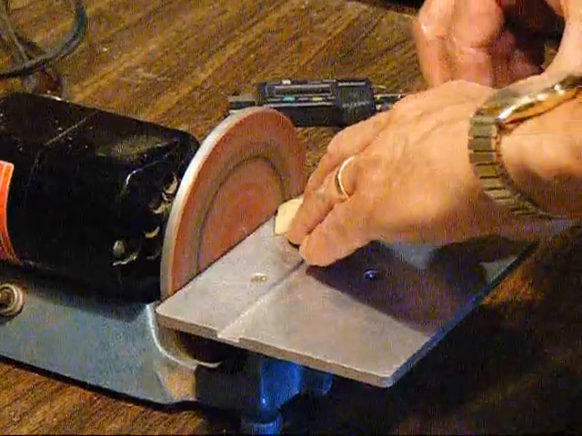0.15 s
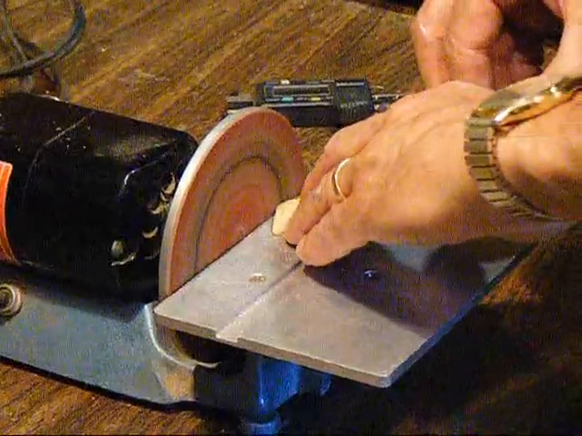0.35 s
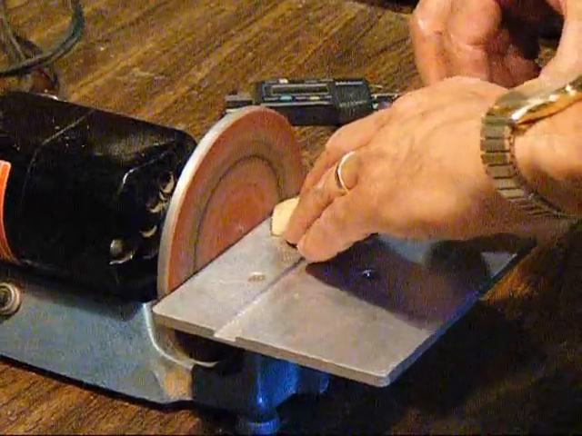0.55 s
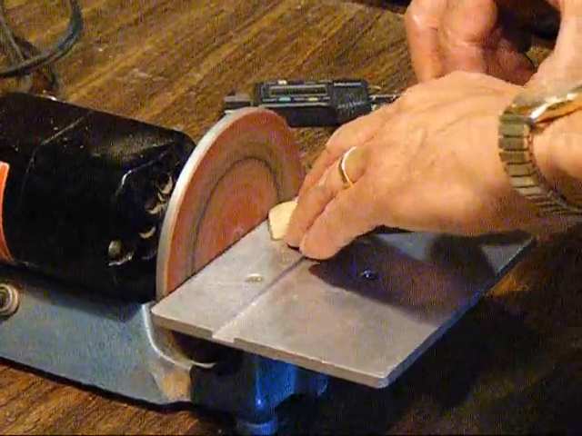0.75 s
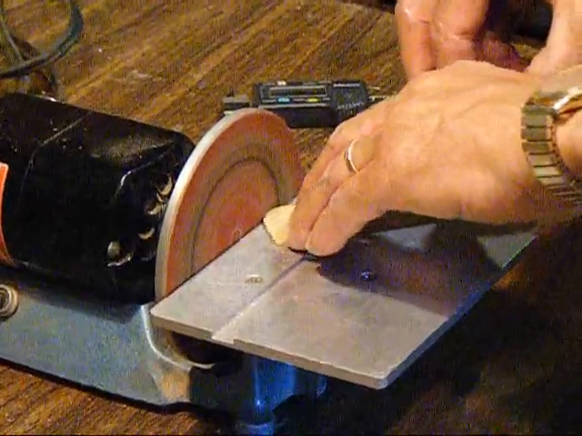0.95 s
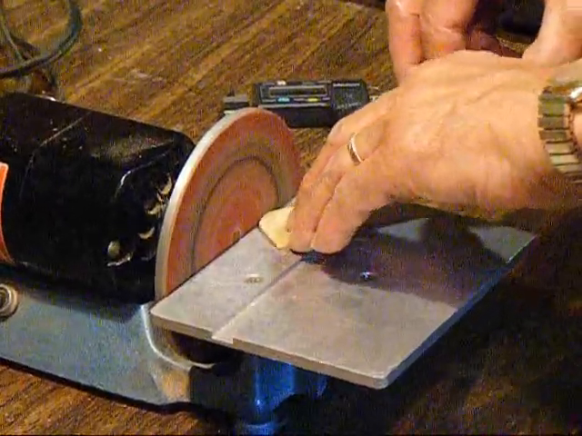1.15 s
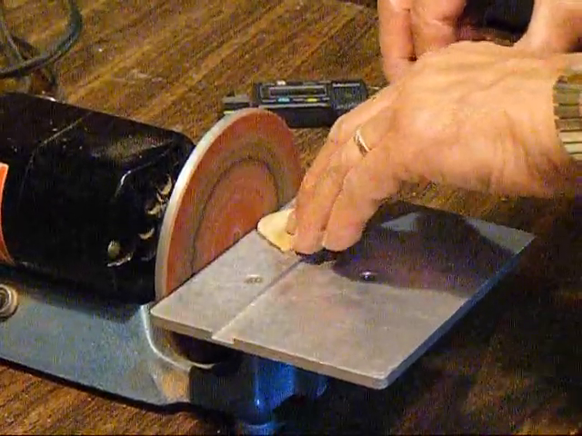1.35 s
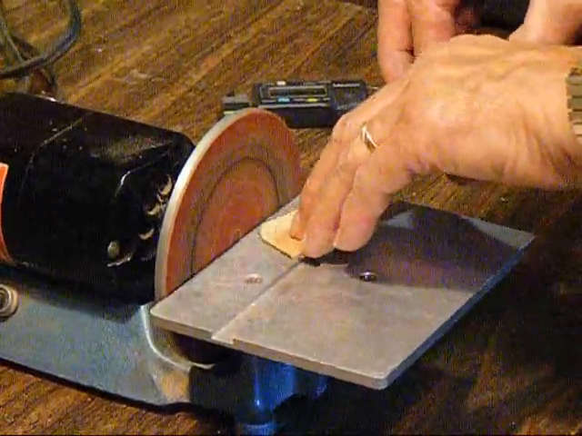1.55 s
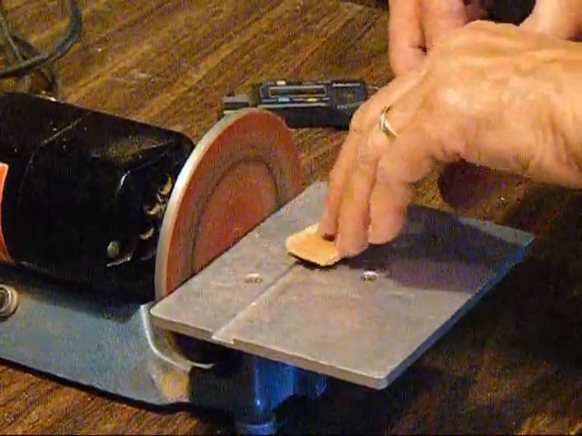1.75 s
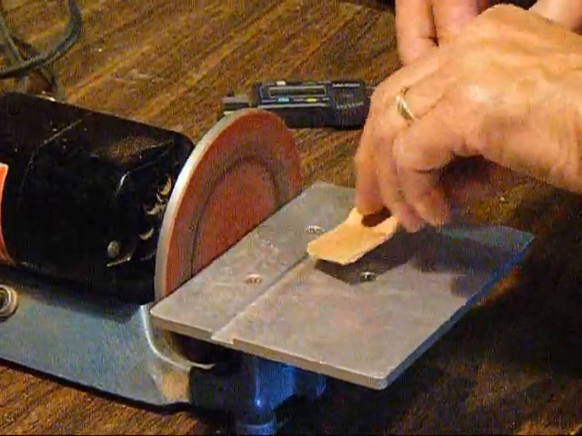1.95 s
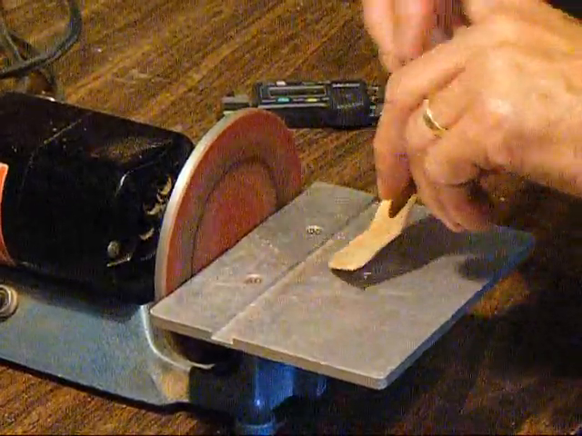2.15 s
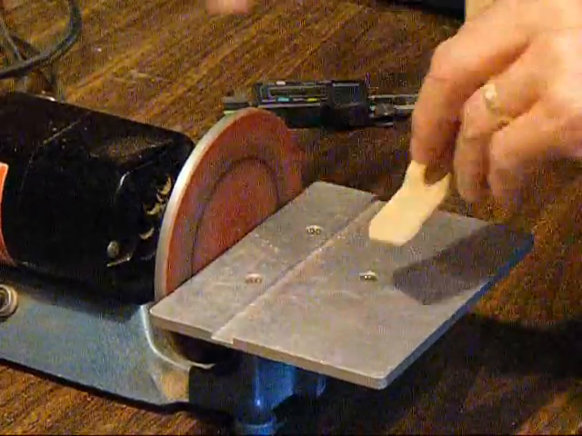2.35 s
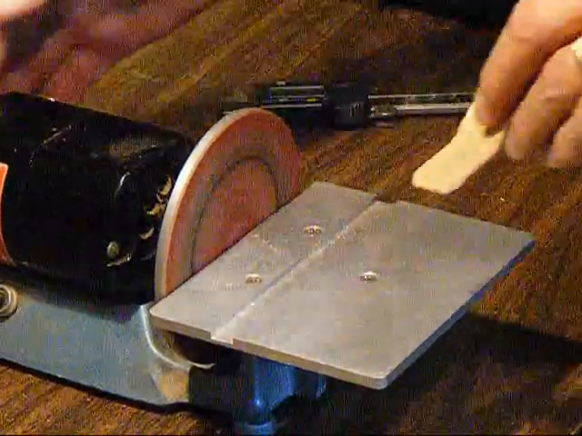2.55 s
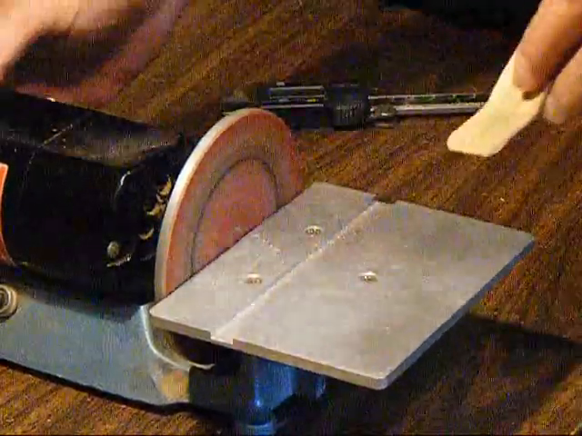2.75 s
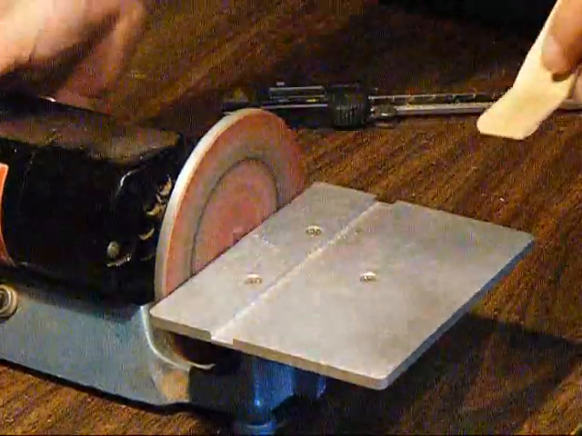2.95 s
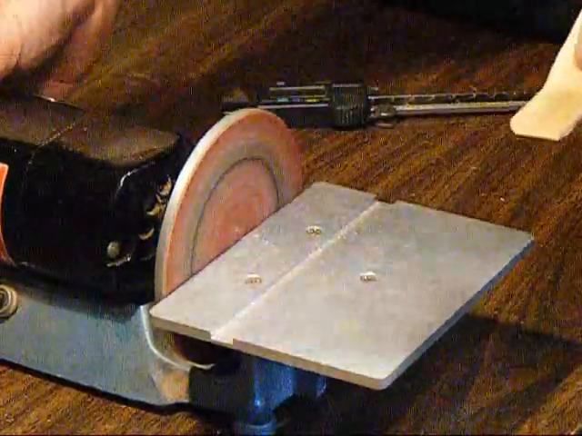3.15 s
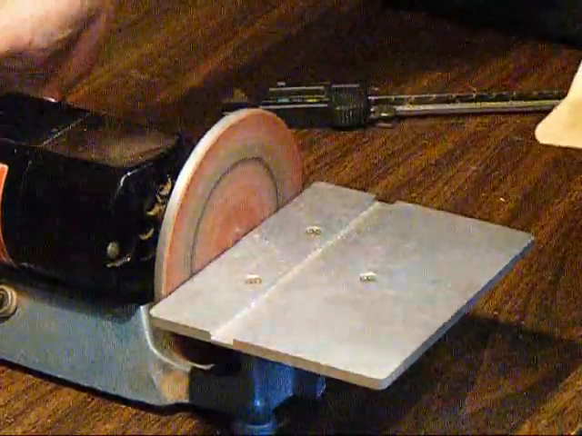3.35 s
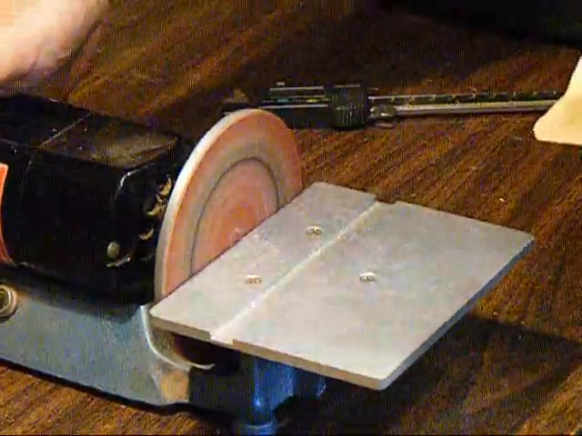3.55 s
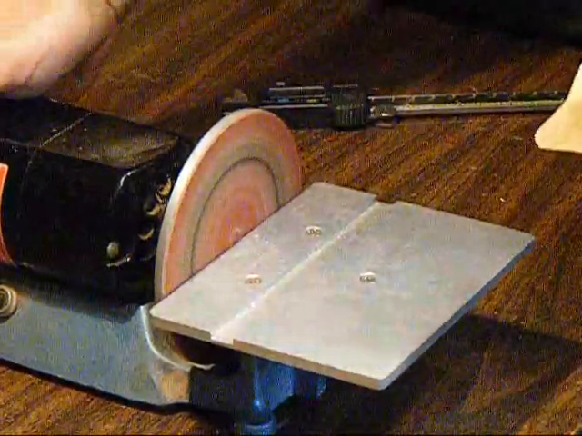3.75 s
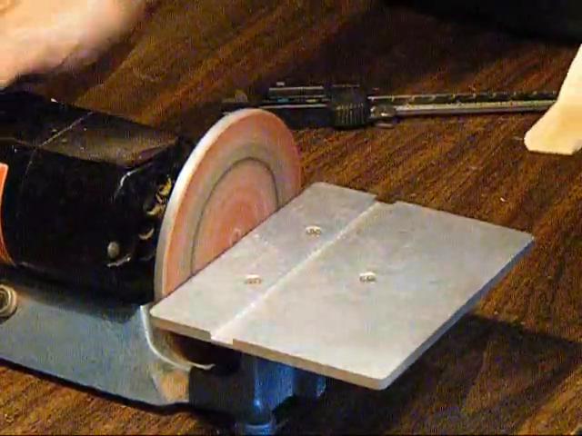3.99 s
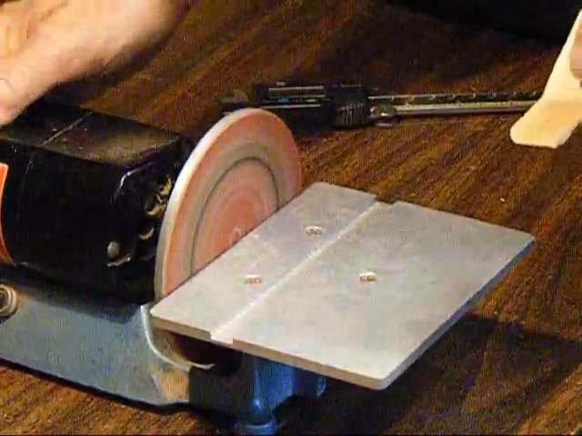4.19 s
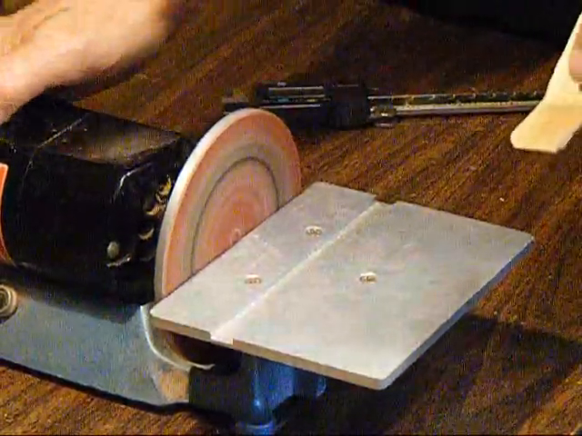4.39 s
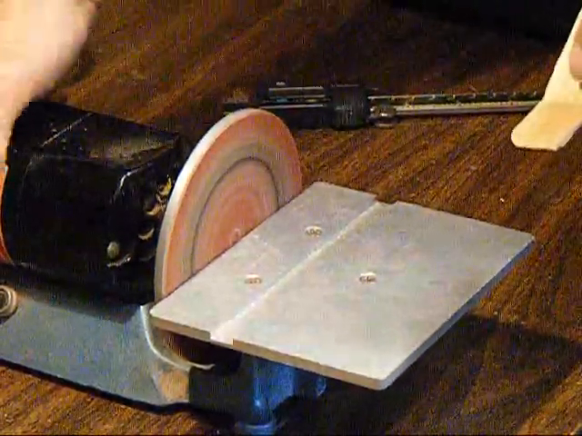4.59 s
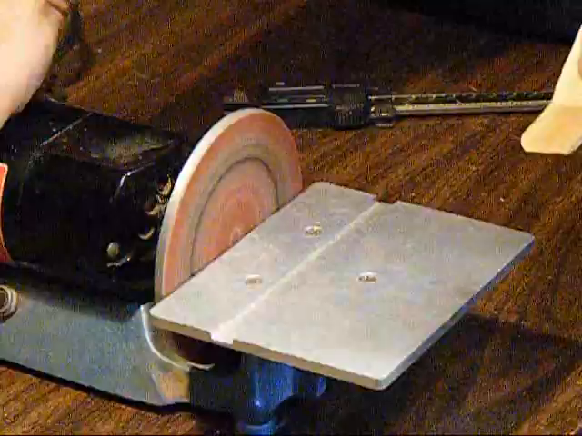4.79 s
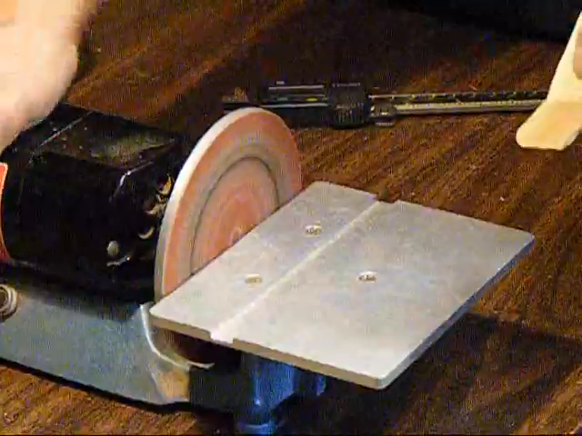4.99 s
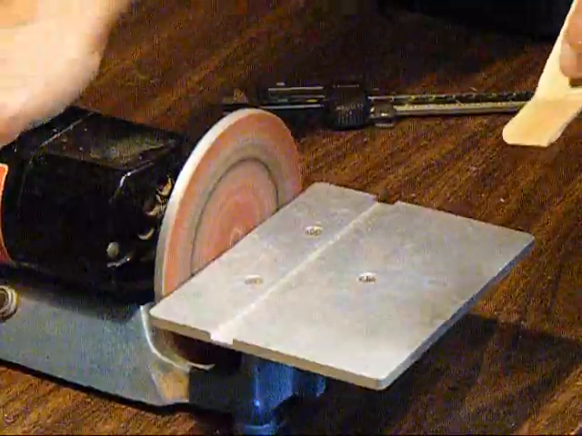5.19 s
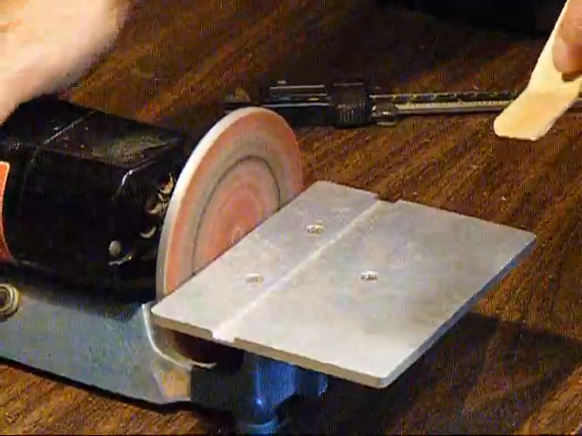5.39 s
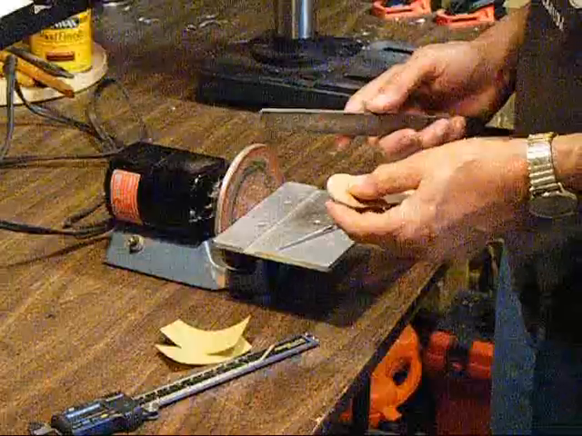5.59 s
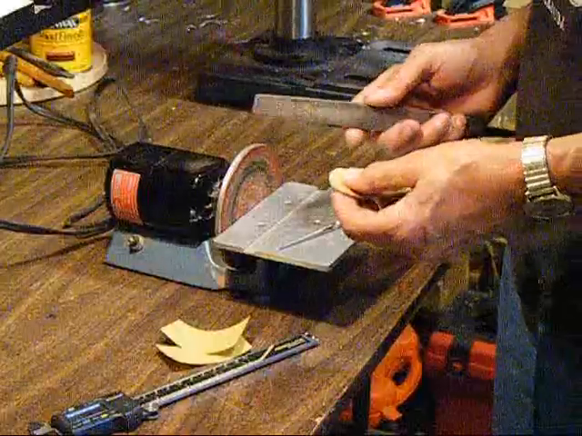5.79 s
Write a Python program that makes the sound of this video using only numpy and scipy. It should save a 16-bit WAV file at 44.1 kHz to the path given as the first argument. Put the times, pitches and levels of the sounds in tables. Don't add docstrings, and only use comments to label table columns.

```python
import sys
import numpy as np
from scipy import signal
from scipy.fft import rfft, irfft
from scipy.io import wavfile

SR = 44100
rng = np.random.default_rng(int(sys.argv[2]) if len(sys.argv) > 2 else 0)


def output_pcm(signal):
    pcm = np.clip(np.atleast_2d(signal).T, -1, 1) * 32767
    wavfile.write(sys.argv[1], SR, np.round(pcm).astype(np.int16))


def makeup_ratio(level_db):
    decades = np.asarray(level_db, float) / 20
    return 10 ** decades


N = 257103
TIME = np.arange(N) / SR
CUT_S = 5.5822

# time [s], level [dB].
SHAKE = [(0.0, -35), (0.03, -37), (0.26, -31), (0.53, -36), (0.94, -30.5), (1.15, -33.5), (1.26, -29.5),
         (1.49, -27.5), (2.79, -27), (3.18, -23), (4.06, -26.5), (4.34, -20.5), (4.93, -26), (5.04, -24),
         (5.15, -25.5), (5.35, -22.5), (5.57, -23.5)]


def in_time(rows):
    seconds, values = np.transpose(rows)
    return np.interp(TIME, seconds, values)


def drift(rate_hz):
    r = np.exp(-80 * np.pi * rate_hz / SR)
    noise = rng.standard_normal(N // 40 + 2002)
    slow = signal.lfilter([1], [1, -2 * r, r * r], noise)[2000:]
    return np.interp(np.arange(N) / 40, np.arange(len(slow)), slow / slow.std())


def colour(x, points):
    hz = np.maximum(np.arange(N // 2 + 1) * SR / N, 1)
    point_hz, point_db = np.transpose(points)
    gain_db = np.interp(np.log(hz), np.log(point_hz), point_db)
    return irfft(rfft(x) * makeup_ratio(gain_db) * np.sqrt(SR / 2), N)


def ring(x, hz, t60):
    r = makeup_ratio(-60 / (t60 * SR))
    w = 2 * np.pi * hz / SR
    return signal.lfilter([0, np.sin(w)], [1, -2 * r * np.cos(w), r * r], x + 1e-18)


def rotor(speed, angle):
    # multiple of the turn, level [dB].
    harmonics = [(2, -52.4), (3, -49.3), (4, -50.9), (5, -52.7), (6, -56.9), (7, -55.0), (8, -46.5),
                 (9, -54.4), (10, -70.5), (11, -47.9), (12, -58.3), (13, -46.4), (14, -44.7), (15, -58.0),
                 (16, -51.2), (17, -70.5), (18, -48.3), (19, -54.3), (20, -50.8), (21, -53.9), (22, -53.5),
                 (23, -58.0), (24, -53.3), (25, -53.4), (26, -58.0), (27, -56.4), (28, -63.6), (29, -61.0),
                 (30, -70.5), (31, -67.4)]
    # frequency [Hz], width [Hz], level [dB].
    frame_modes = [(333.6, 6.0, -48.8), (1007.4, 12.0, -48.8), (1029.0, 18.0, -44.9), (1165.2, 21.0, -49.2),
                   (1374.9, 24.0, -41.1), (1558.6, 11.7, -51.1), (1667.0, 13.0, -40.2),
                   (1694.6, 30.0, -40.8), (1712.6, 8.0, -42.0), (1883.9, 14.3, -38.5),
                   (2003.3, 15.6, -41.1), (2043.6, 24.0, -39.3), (2213.9, 6.5, -37.0), (2251.3, 6.5, -38.9),
                   (2382.5, 42.0, -45.2), (2417.8, 4.9, -44.1), (2424.5, 11.2, -35.8), (2504.1, 5.2, -34.8),
                   (2518.5, 30.0, -29.2), (2576.1, 19.5, -35.3), (2848.2, 34.0, -42.9),
                   (2886.9, 13.6, -34.4), (2899.2, 34.0, -36.1), (2911.4, 13.6, -34.8),
                   (2927.7, 8.5, -47.0), (3117.2, 23.4, -49.3), (3194.7, 6.6, -39.7), (3283.6, 57.0, -46.8),
                   (3933.5, 69.0, -52.8)]
    # start [s], end [s], multiple, change [dB].
    squeals = [(0, .07, 20, -10), (0, .42, 12, 5.5), (0, .79, 15, 4), (.16, 1.03, 11, 4), (.24, .55, 6, -9),
               (.28, .34, 18, -12), (.28, 1.38, 27, 10), (.31, .76, 24, -9.5), (.34, .61, 19, -11),
               (.36, 1.71, 13, 5.5), (.42, .76, 2, -6), (.45, 1.24, 18, 7), (.52, .78, 16, -8),
               (.6, .74, 22, 7), (.74, .83, 18, 3), (.74, .87, 27, 3.5), (.85, 1.02, 13, -5),
               (.97, 1.14, 18, -9), (.99, 1.38, 20, -7.5), (.99, 1.9, 12, 3), (1.03, 1.35, 15, 9),
               (1.08, 1.95, 14, 6), (1.12, 1.5, 4, 4), (1.13, 1.23, 13, -6), (1.15, 1.25, 18, 3),
               (1.17, 1.3, 27, 2.5), (1.18, 2.04, 8, 3.5), (1.22, 1.41, 14, 2.5), (1.22, 1.41, 22, 10),
               (1.24, 2.2, 29, 5.5)]
    # start [s], end [s], multiple, change [dB].
    fades = [(1.47, 1.58, 15, 3), (1.48, 2.13, 28, 8), (1.53, 1.98, 25, -9.5), (1.83, 5.3, 30, -7),
             (1.93, 2.22, 13, -6), (1.93, 2.18, 15, 3), (2.38, 2.97, 21, -6), (2.62, 2.77, 15, -6.5),
             (2.82, 3.01, 13, 4.5), (2.82, 3.58, 16, -7.5), (2.88, 3.6, 26, 6.5), (2.94, 3.17, 14, 3),
             (3.04, 3.49, 24, -10), (3.52, 4.21, 7, -5), (3.9, 4.8, 10, -4), (4.26, 4.78, 15, 3),
             (4.27, 5.6, 27, 4), (4.54, 5.6, 24, 4), (4.68, 5.6, 17, -6), (4.74, 5.6, 26, -9),
             (4.95, 5.6, 20, -10), (5.01, 5.6, 16, -6.5), (5.29, 5.6, 11, 5)]
    # centre [s], length [s], change [dB].
    bites = [
        (0.546, 0.16, -2.5),
        (0.798, 0.13, 3.5),
        (1.242, 0.1, 1.5),
        (3.21, 0.065, 2),
        (4.05, 0.28, -2),
    ]
    bite_from = 11
    flicker, floor_db, flicker_hz = 0.19, -50, 12.0
    lift_s, roam_loaded, roam_free = 1.4, 0.9, 0.4
    blow_at = 1.15
    smear = 0.05
    smear_centre = 14

    shake = makeup_ratio(in_time(SHAKE) - 0.6 + 0.55 * drift(6.9)) * np.sin(angle)
    angle = angle + 0.013 * drift(8.0)
    spread = np.interp(TIME, [3.2, 4.4], [0.55, 0.4])
    roam = np.where(TIME < lift_s, roam_loaded, roam_free)

    coarse = np.arange(0, N, 128)
    s = coarse / SR
    bites_db = sum(db * np.exp(-(2 * (s - at) / length) ** 2) for at, length, db in bites)
    tones = 0
    faint_top = [(k, -67) for k in range(32, 36)]
    for k, base_db in harmonics + faint_top:
        size = makeup_ratio(base_db)
        for hz, width, db in frame_modes:
            size = size + makeup_ratio(db) / (1 + (2 * (k * speed[coarse] - hz) / width) ** 2)

        jumps_db = (k >= bite_from) * bites_db
        for start, end, multiple, db in squeals + fades:
            if multiple == k:
                ramp = np.minimum((s - start) / 0.025, (end - s) / 0.11)
                jumps_db = jumps_db + db * np.clip(ramp + 0.5, 0, 1)
        size = np.interp(np.arange(N), coarse, size * makeup_ratio(jumps_db))
        size = np.abs(size + flicker * np.sqrt(size * makeup_ratio(floor_db)) * drift(flicker_hz))

        lag = spread * max(k / smear_centre, 1) ** 1.5 * rng.standard_normal()
        lag = lag + 0.2 * drift(5.0) + roam * drift(1.1)
        lag = lag + smear * (k - smear_centre) ** 2
        tones += size * np.cos(k * (angle - blow_at) + lag)
    return np.sqrt(2) * (shake + tones)


def ripple(angle):
    # multiple of the turn, multiple of the ripple (sum or difference), level [dB].
    ripple_lines = [(0, 1, -53.5), (1, 1, -59.5), (3, 1, -61), (5, 1, -58.5), (7, -1, -57.5),
                    (6, -1, -59.5), (12, 1, -42.5), (12, 2, -52.5), (12, -1, -58), (24, -1, -58)]
    # time [s], change [dB].
    bar_ripple = [(0, -4.5), (1.35, -1), (2.0, 2.5), (2.35, -9.5), (3.05, -7.5), (3.5, -7.5), (4.3, 2.1),
                  (5.6, -2)]
    torque_angle = 2 * np.pi * 120 * TIME
    out = 0
    for k, side, db in ripple_lines:
        level_db = db
        if round(k) == 12:
            level_db = level_db + in_time(bar_ripple)
        if round(k) == 1:
            level_db = level_db - 1.5 * (TIME - 1.5)
        phase = round(k) * angle + round(side) * torque_angle + 0.5 * drift(5.0)
        out = out + makeup_ratio(level_db) * np.sin(phase)
    return np.sqrt(2) * out


def rattle(speed, angle):
    # frequency [Hz], density [dB per Hz].
    scratch_colour = [(30, -78), (60, -78.5), (230, -75), (420, -80.5), (600, -76.5), (850, -69),
                      (1150, -75), (1500, -71), (1900, -70.5), (2250, -66.5), (2700, -74.5), (3400, -75.5),
                      (4200, -83), (5500, -105)]
    # frequency [Hz], width [Hz], level [dB].
    loose_parts = [(627, 30, -51), (1030, 59, -47.5), (1082, 50, -45.5), (1200, 78, -47), (1312, 93, -43.5),
                   (1638, 81, -50), (2200, 83, -51.5), (3007, 60, -50)]
    level_db, follows_shake, shake_db_per_turn = -3.5, 0.77, 0.93

    beat = 1 + 0.45 * np.cos(angle - 0.9) + 0.27 * np.cos(2 * angle - 1.6)
    patches = makeup_ratio(1.2 * drift(14.0))
    out = colour(rng.standard_normal(N) * beat * patches, scratch_colour)
    for hz, width, db in loose_parts:
        t60 = np.log(1000) / (np.pi * width)
        part = ring(rng.standard_normal(N) * beat, hz, t60)
        out += makeup_ratio(db + 3.0 * drift(3.6)) * part / part.std()
    swing_db = in_time(SHAKE) - shake_db_per_turn * speed
    return makeup_ratio(level_db + follows_shake * (swing_db - swing_db.mean())) * out


def quiet_shop():
    # frequency [Hz], density [dB per Hz].
    shop_colour = [(20, -87.5), (58, -65), (110, -80), (220, -71), (500, -78), (1200, -79), (2500, -89),
                   (5500, -100)]
    return colour(rng.standard_normal(N) * makeup_ratio(1.6 * drift(23.0)), shop_colour)


def knocks():
    # time [s], peak [dB], contact cutoff [Hz], direction of the push [sign].
    contacts = [(5.5944, -33, 2750, 1), (5.597, -41, 1480, -1), (5.6062, -33.5, 1600, 1),
                (5.6130, -10, 2180, -1), (5.6139, -1.5, 3070, 1), (5.6159, -27, 3100, -1),
                (5.6181, -16, 2200, 1), (5.6198, -19.5, 3600, -1), (5.6199, -12, 2960, 1),
                (5.6281, -34.5, 2200, 1), (5.637, -24.5, 2360, -1), (5.684, -36.5, 1200, 1),
                (5.757, -31, 2820, 1), (5.766, -37, 1620, -1)]
    # frequency [Hz], level [dB], t60 [s].
    bench_modes = [(100, -3.5, 0.26), (426, -22, 0.14), (868, -2.5, 0.037), (797, -28.5, 0.23),
                   (875, -20, 0.27), (1100, -9, 0.011), (1232, -26.5, 0.09), (1377, 1.5, 0.017),
                   (1814, -6, 0.012), (2200, -8.5, 0.0071), (2560, -10.5, 0.018), (2895, -12, 0.027),
                   (3080, -9.5, 0.013), (3540, -11.5, 0.021)]
    spread_db = -0.2
    echo_db, echo_t60, echo_rise_s = -22, 0.15, 0.0027

    out = np.zeros(N)
    luck = rng.standard_normal((len(contacts), len(bench_modes)))
    echo_band = signal.butter(2, [350, 1300], "band", fs=SR, output="sos")
    diffuse = signal.sosfilt(echo_band, rng.standard_normal(N))
    for (at, peak_db, cut_hz, direction), chances in zip(contacts, luck):
        start = round(at * SR)
        click = np.zeros(N - start)
        click[0] = np.sign(direction) * makeup_ratio(peak_db - 7.5)
        click = signal.sosfilt(signal.butter(4, cut_hz, fs=SR, output="sos"), click)
        for (hz, db, t60), chance in zip(bench_modes, chances):
            out[start:] += ring(click * makeup_ratio(db + spread_db * chance), hz, t60)

        age = np.arange(N - start) / SR
        decay = makeup_ratio(peak_db + echo_db - 60 * age / echo_t60)
        out[start:] += decay * np.minimum(age / echo_rise_s, 1) * diffuse[start:]
    out = signal.sosfilt(signal.butter(6, 3750, fs=SR, output="sos"), out)
    return signal.sosfilt(signal.butter(1, 420, "high", fs=SR, output="sos"), out)


def scene():
    # time [s], speed [turns per s].
    turn_speed = [(0.08, 163.62), (0.4, 164.74), (0.6, 164.83), (1.0, 164.74), (1.2, 165.31), (1.6, 166.99),
                  (2.0, 168.54), (2.4, 169.8), (2.8, 170.68), (3.2, 171.38), (4.0, 172.3), (4.8, 172.89),
                  (5.45, 173.35)]
    speed = in_time(turn_speed)
    angle = 2 * np.pi * np.cumsum(speed) / SR
    sander = rotor(speed, angle) + ripple(angle) + rattle(speed, angle)
    shop = quiet_shop() + knocks()
    running = np.clip((CUT_S - TIME) / 0.0014, 0, 1)
    return (running * sander + (1 - running) * shop)[None]


def low_pass(x):
    return signal.sosfilt(signal.butter(12, 16040, fs=SR, output="sos"), x)


def record(dry):
    hold, steps, offset = 4, 128, -0.012
    slip_s, slip_every = 0.1005, 11025
    hz = np.arange(N // 2 + 1) * SR / N
    treble_lift = 1 / np.sinc(np.minimum(hz * hold / SR, 0.5))
    steep_cut = 1 / (1 + (hz / 6100) ** 16)
    smooth = irfft(rfft(dry[0]) * treble_lift * steep_cut, N)

    n = np.arange(N)
    clock = n + 1 + (n - round(slip_s * SR)) // slip_every
    clock = np.where(n > CUT_S * SR, n, clock)
    held = smooth[np.maximum(n - clock % hold, 0)]
    stepped = np.round((held + offset) * steps) / steps
    return low_pass(stepped[None])


dry = scene()
out = record(dry)
output_pcm(out)
```